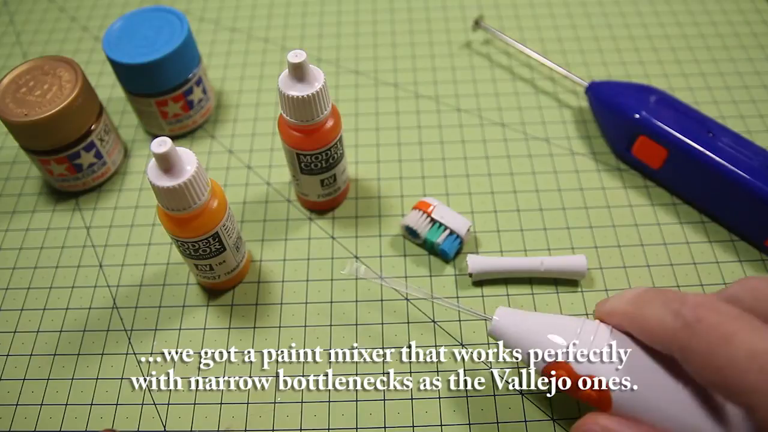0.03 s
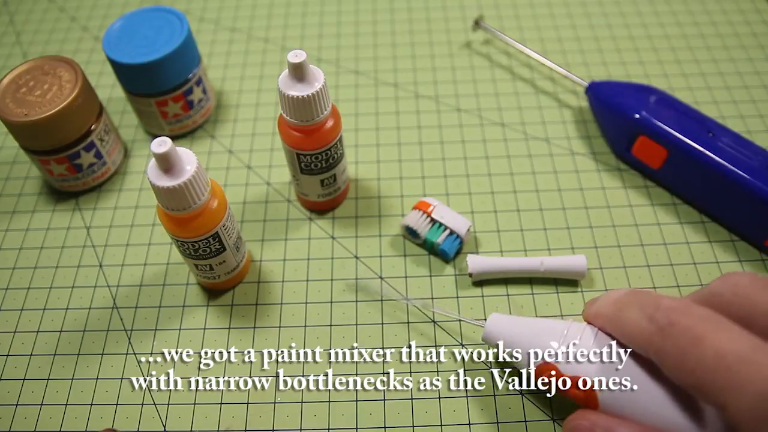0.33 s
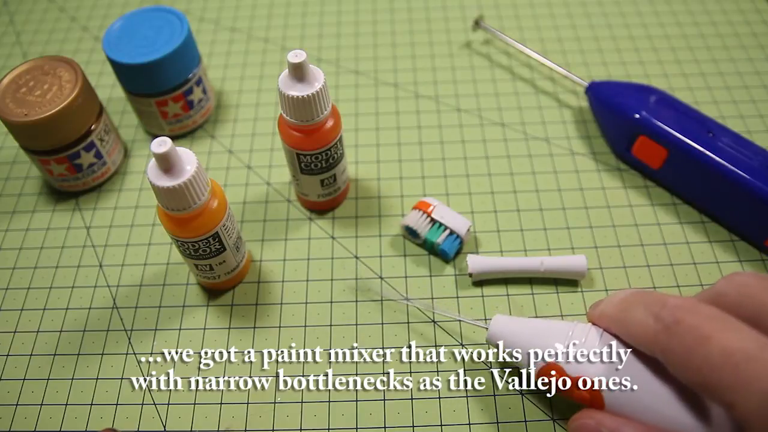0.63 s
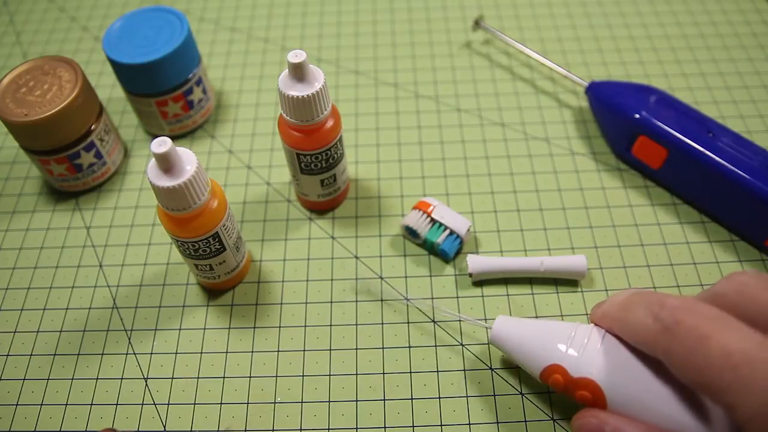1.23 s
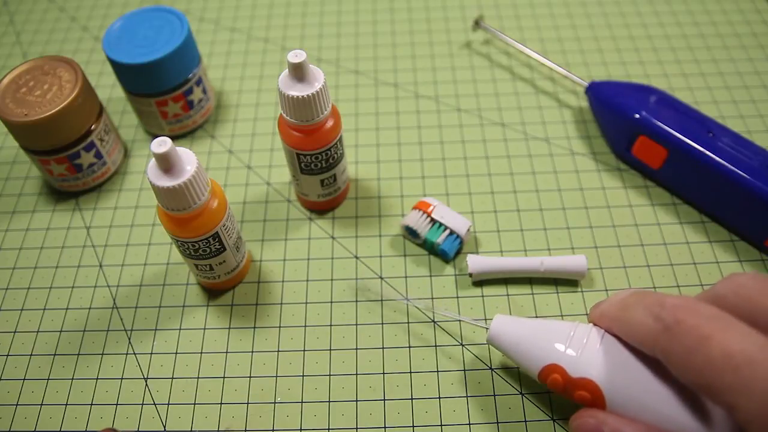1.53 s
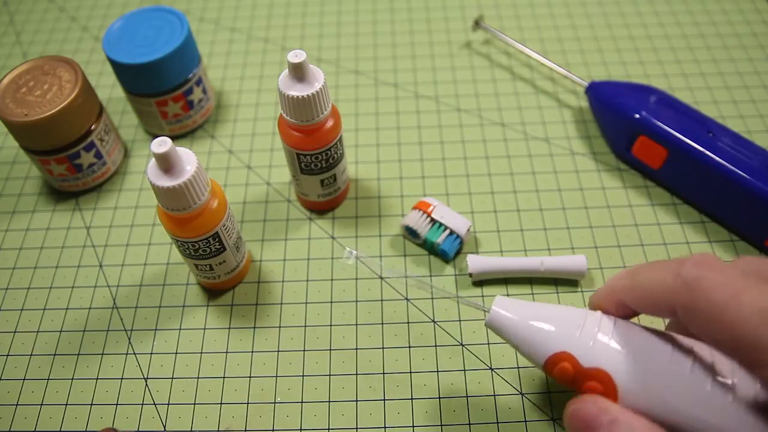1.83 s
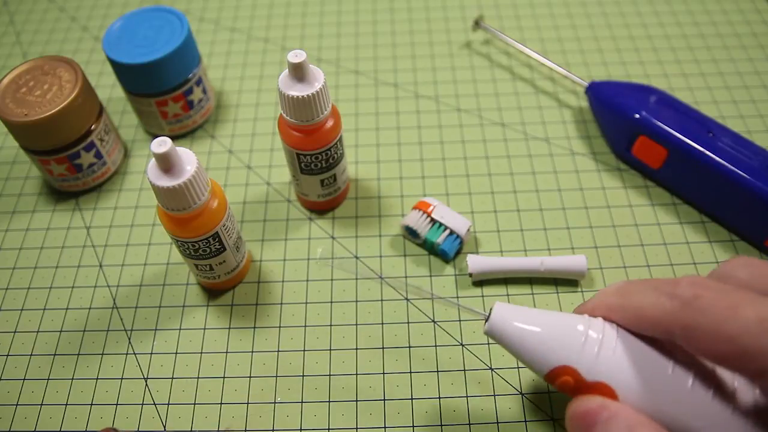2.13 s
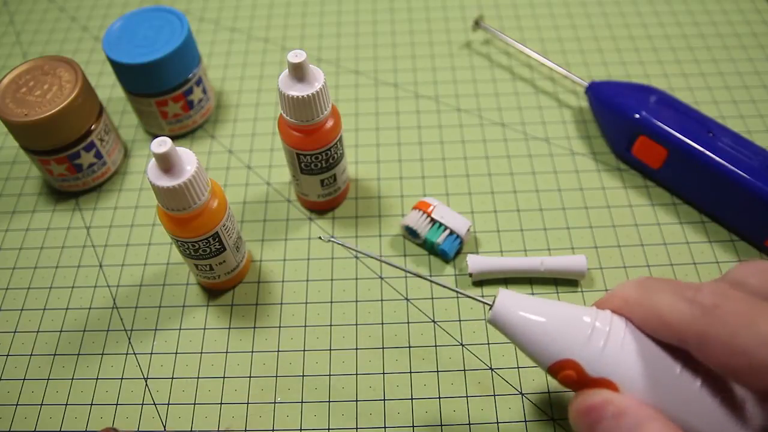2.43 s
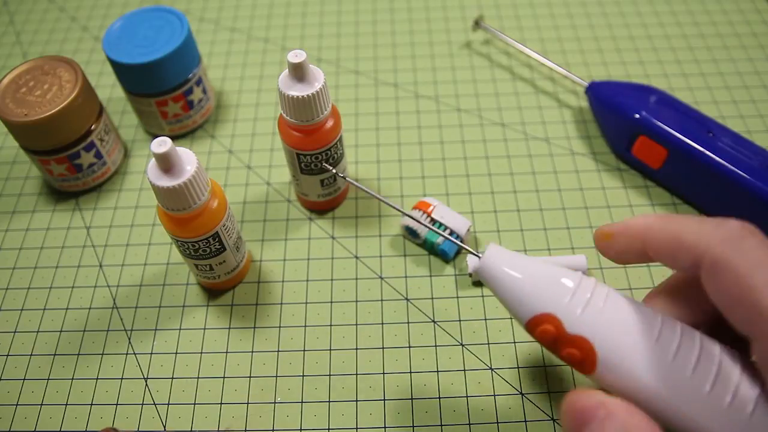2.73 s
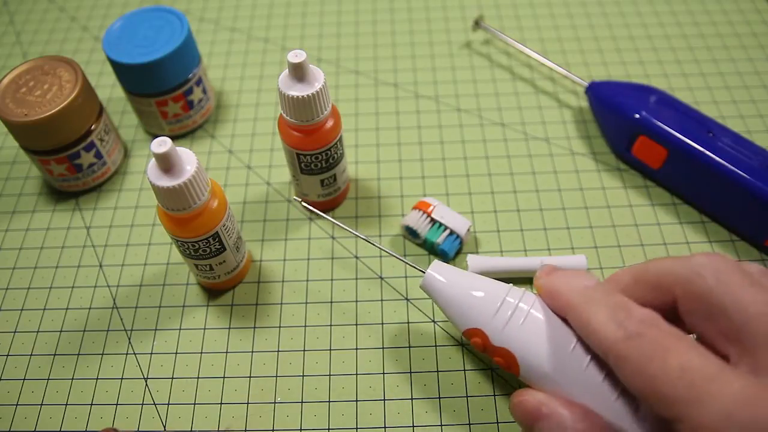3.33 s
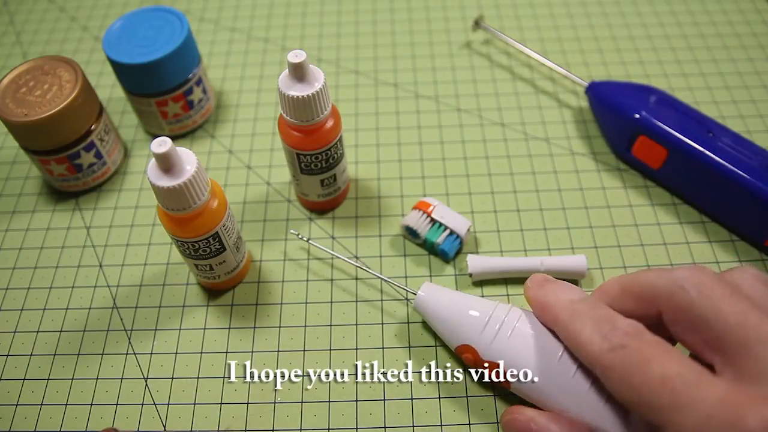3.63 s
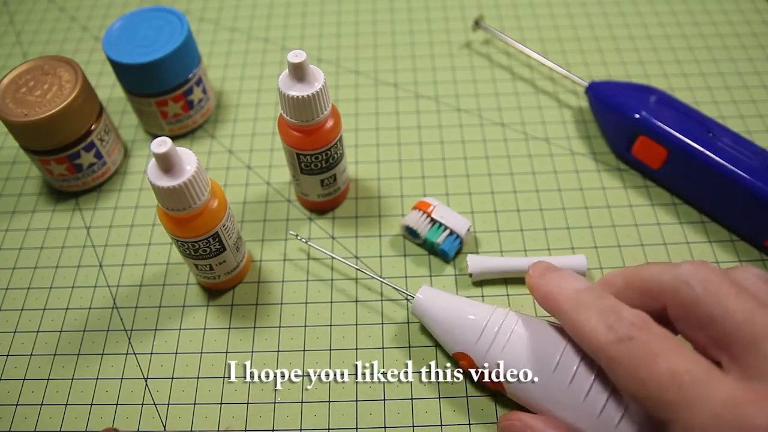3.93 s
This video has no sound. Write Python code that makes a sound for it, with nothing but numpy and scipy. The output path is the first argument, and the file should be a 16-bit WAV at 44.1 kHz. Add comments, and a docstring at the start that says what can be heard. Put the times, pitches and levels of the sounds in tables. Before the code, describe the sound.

A small battery mixer hums with a thin buzz from the start. Between about 0.3 and 1.8 seconds its wire whisk rattles in several short, loud bursts. The motor turns rougher, then stops with a sharp switch click at 2.4 seconds. Fingers tick faintly on the plastic case. At 3.5 seconds the mixer is set down on a table with a thump, followed by a few light ticks.

```python
"""A small battery mixer hums in the hand above a table in a bare little room. From 0.35 s to 1.75 s its wire
whisk whips into bursts of rattling, about one knock per turn, which drag the motor down. At 2.4 s the switch
snaps off and the motor dies away. Fingers then shift on the plastic case, and at 3.5 s the mixer is set down:
the impact excites the modes of the table in a thump, and a few last ticks follow."""
import sys
import numpy as np
from scipy import signal
from scipy.fft import rfft, irfft
from scipy.io import wavfile
from scipy.ndimage import uniform_filter1d

SR = 44100
rng = np.random.default_rng(int(sys.argv[2]) if len(sys.argv) > 2 else 0)


def dump_mix(stems):
    """Bounce the given channels to the path in sys.argv[1] as a 16-bit WAV at rate SR."""
    frames = np.atleast_2d(stems).T  # one column per channel
    limited = np.clip(frames, -1, 1)  # hard clip at full scale
    pcm = np.round(limited * 32767).astype(np.int16)
    wavfile.write(sys.argv[1], SR, pcm)


N = 176400
T = np.arange(N) / SR
OFF_S = 2.4225

# Levels are relative; spectra give level per unit bandwidth.
# bursts of rattling: t/s, length/s, first knock rate/Hz, sag of rate/Hz, first level/dB, last level/dB
RATTLE_BURSTS = [(0.3467, 0.13, 102, 5.5, -1, -1.5), (.4977, 0.12, 102.4, 5.3, 0, -0.5),
                 (0.7086, 0.063, 102.1, 5.8, -2, 0), (0.9192, .082, 101.1, 10, 0.5, -2),
                 (1.2530, 0.11, 101.3, 6.4, -1, 1), (1.4864, 0.072, 100.2, 4.2, -4, -0.5),
                 (1.6177, 0.073, 104.8, 15.45, -1, -4.5), (1.6895, 0.043, 102.3, 6.85, -1.5, -3.5)]
# lone touches of the wire: t/s, level/dB
WIRE_TOUCHES = [(.6996, -10), (1.6086, -12)]
# spectra of a knock in the case and of its thud in the handle: f/Hz, level/dB
KNOCK_SPECTRUM = [(60, 12), (100, -22), (140, -33.5), (200, -28), (300, -29.5), (500, -16), (850, -23),
                  (1350, -4), (1700, -6), (2500, 3), (3200, -5.5), (4200, 2.5), (5000, -7), (7200, -15.5),
                  (8500, -12), (10000, -15.5), (13500, -18.5), (16000, -42)]
THUD_SPECTRUM = [(10, -57.5), (45, -42), (100, -12), (140, -21), (200, -5), (290, -2.5), (480, 5), (680, 4),
                 (850, -1.5), (1300, 10.5), (2500, -31), (16000, -62.5)]
# modes of the case and wire: f/Hz, level/dB, t60/s
CASE_MODES = [(1390, -43, .02), (2525, -52.5, 0.017), (2510, -28, .034), (2840, -45, .04), (3680, -36, .04),
              (3698, -40, .02), (4330, -34, .02), (4940, -38, 0.026), (5760, -38, 0.039),
              (8420, -38.5, .025)]

# rotation rate of the motor: t/s, f/Hz
MOTOR_SPEED = [(0, 99.55), (.33, 99.75), (.37, 97.5), (.53, 100), (.63, 96.3), (.72, 101), (.79, 96),
               (.88, 100), (1.05, 99.6), (1.24, 100), (1.38, 97.3), (1.48, 99), (1.76, 97.3), (1.88, 100.9),
               (1.96, 101.4), (2.04, 97.9), (2.11, 96.8), (2.22, 96.6), (2.32, 94.2), (2.42, 90)]
# levels of the motor's parts: t/s, buzz/dB, strong orders/dB, whine/dB, brush ticks/dB, sizzle/dB
MOTOR_LEVELS = [(0, -46, -41.5, -54.5, -50.5, -74), (.33, -46, -40.5, -56.5, -51, -68),
                (1.15, -46, -49, -66.5, -60.5, -68.5), (1.9, -47, -53, -64, -64, -66.5),
                (2.08, -47, -50.5, -54, -61, -58), (2.22, -44.5, -53, -53, -60.5, -55),
                (2.33, -42.5, -49.5, -43.5, -60, -62.5), (2.42, -47, -49, -56, -62.5, -58)]
# irregularity of the motor: t/s, roughness (0-1)
MOTOR_ROUGHNESS = [(.3, .08), (1.2, .25), (2.2, .2), (2.33, .5), (2.42, .7)]
# strong orders: multiple of the rotation rate; level/dB of each
STRONG_ORDERS = [6, 11, 12, 19, 20, 24, 27, 28, 29, 30, 34, 36, 40, 42, 44]
ORDER_LEVELS = [-17.5, -15, -21.5, -0.5, 1, 2, -1.5, -4.5, 1.5, -3, -1.5, 3.5, -9.5, 3, -14.5]
# spectra of the case's buzz and the brushes' ticks and sizzle: f/Hz, level/dB
BUZZ_SPECTRUM = [(90, -22.5), (800, -17.5), (1300, -7), (2000, -1.5), (2700, -5), (3300, -9.5), (4200, -2),
                 (5200, -13), (7000, -16), (16000, -15)]
BRUSH_SPECTRUM = [(2000, -30), (5500, -11.5), (7200, -14.5), (9000, -6), (10700, 10.5), (13200, -8.5),
                  (15300, 13), (16500, -3)]
SIZZLE_SPECTRUM = [(2000, -13), (6000, -10), (8900, -9.5), (9700, 0), (11200, 1.5), (11900, -12),
                   (13800, -7), (15200, -2), (16500, -1.5)]

# spectra of the switch, heard directly and as radiated into the room: f/Hz, level/dB
SNAP_SPECTRUM = [(40, -21), (1200, -8.5), (2200, -6.5), (3200, -6), (4200, 4.5), (5500, -3), (7000, -6),
                 (8700, 5), (10200, -3.5), (12200, 3), (14500, -1), (16000, -29.5)]
SNAP_ROOM_SPECTRUM = [(100, -32), (2000, -15), (4300, -4), (6500, 2), (8000, -2), (9000, 1.5), (10500, -4),
                      (12500, 0), (16000, -9.5)]
# blows on the table: t/s, blow level/dB, crack level/dB
LANDING_BLOWS = [(3.4648, 2, 7.5), (3.469, -9.5, 0.5)]
# modes of the table top, then its long-ringing low modes: f/Hz, level/dB, t60/s
TABLE_MODES = [(275, -28.5, 0.028), (433, -14, .035), (457, -16, 0.034), (575, -14.5, 0.068),
               (662, -10.5, 0.027), (933, -16.5, 0.026), (1112, -22, .03)]
TABLE_LOW_MODES = [(116, -38, 0.63), (193.5, -38.5, 0.24)]
# spectra of the table's boom and the plastic's crack: f/Hz, level/dB
BOOM_SPECTRUM = [(10, -49.5), (40, -33), (90, -20.5), (145, -30), (200, -5), (300, -15.5), (440, 2.5),
                 (680, -1.5), (800, -2.5), (950, 0.5), (1120, -2.5), (1350, -27.5), (3000, -40.5),
                 (16000, -73)]
CRACK_SPECTRUM = [(100, -4.5), (1300, -0.5), (1900, 7.5), (3000, -0.5), (3800, -6.5), (5000, 0.5),
                  (7500, -11), (11000, -15), (16000, -31.5)]
# ticks of fingers and loose plastic: t/s, level/dB, centre f/Hz, t60/s
HANDLING_TICKS = [(2.2543, -23.5, 3000, 0.011), (2.3915, -11, 2430, 0.0065), (2.551, -15, 2170, 0.021),
                  (2.565, -23, 5040, 0.011), (2.578, -26, 2230, 0.014), (2.745, -28, 9000, 0.078),
                  (2.762, -27.5, 7900, 0.047), (2.9758, -32.5, 3500, 0.025), (3.0978, -26, 2300, 0.036),
                  (3.152, -29.5, 1890, .05), (3.1846, -33, 2000, .02), (3.606, -15.5, 3820, .035),
                  (3.635, -20.5, 8000, 0.056), (3.651, -21, 1700, .03)]

# spectrum of the room's hiss and rumble: f/Hz, level/dB
AMBIENT_SPECTRUM = [(15, -36.5), (25, -27.5), (170, -5.5), (195, -4), (575, -4.5), (754, -3.5), (1190, -7),
                    (2350, -9), (2840, -10.5), (6920, -16), (16000, -27)]
# reverberation time of the room: f/Hz, t60/s
ROOM_DECAY = [(100, 0.81), (500, .5), (1400, 0.53), (4000, 0.36), (9000, 0.41), (16000, 0.26)]


def whisk_knocks(release_s=.032, release_db_per_s=628):
    """Impact train (t/s, level/dB): the rate sags through each burst, then the level decays."""
    knocks = list(WIRE_TOUCHES)
    for start, length, first_hz, sag_hz, first_db, last_db in RATTLE_BURSTS:
        t = 0
        while t < length + release_s:
            progress = min(t / length, 1)
            db = first_db + (last_db - first_db) * progress
            knocks.append((start + t, db - release_db_per_s * max(t - length, 0)))
            t += 1 / (first_hz - sag_hz * progress ** 2)
    return knocks


def whisk_rattle(chatter_s=0.004, push=0.44, jitter_s=.0001, spread_db=.6, size=900):
    """Impact excitation: each knock thuds through the handle, and its chatter rings the case."""
    drives, pushes = np.zeros((len(RATTLE_BURSTS), N)), np.zeros(N)
    middles = np.array([start + length / 2 for start, length, *_ in RATTLE_BURSTS])
    draws = rng.standard_normal((160, size + 2))
    for (s, db), (late, loud, *grain) in zip(whisk_knocks(), draws):
        chatter = highpass(grain * np.exp(-T[:size] / chatter_s), hz=900)
        contact = amp(-3) * unit_energy(chatter)
        contact[0] += push
        at, strength = s + jitter_s * late, amp(db + spread_db * loud)
        add(drives[np.argmin(abs(middles - s))], at, strength * contact)
        add(pushes, at, np.array([strength]))
    # each burst rings the case a little differently
    ringing = sum(through(drive, dense_modes(t60=0.01)) for drive in drives)
    case = through(ringing, colour(KNOCK_SPECTRUM)) + through(pushes, ring(CASE_MODES))
    thud = through(through(pushes, colour(THUD_SPECTRUM)), dense_modes(t60=.04))
    hum = through(pushes, ring([(198, -50, 0.23)]))
    sound = reverberate(amp(11) * case + amp(-9) * thud, wet_db=-13) + hum
    return highpass(sound, hz=92, order=4)


def turn_pulses(turns):
    """Band-limited sampling: one windowed sinc impulse at each completed turn."""
    pulses, near = np.zeros(N + 16), np.arange(-8, 9)
    for at in np.interp(np.arange(1, int(turns[-1])), turns, np.arange(N)):
        pulses[int(at) + near] += np.sinc(near - at % 1) * np.hanning(len(near))
    return pulses[:N]


def motor(flutter=.0003, spark_turns=.35, whine_order=15, coast_s=0.016):
    """Periodic forcing: each turn shakes the case and sparks the brushes, giving harmonics of the rate."""
    hz = np.interp(T, *np.transpose(MOTOR_SPEED)) * (1 + flutter * wander(size=900))
    turns = np.cumsum(hz) / SR
    times, *levels = np.transpose(MOTOR_LEVELS)
    buzz, strong, whine, brush, sizzle = (amp(np.interp(T, times, level)) for level in levels)
    rough = np.interp(T, *np.transpose(MOTOR_ROUGHNESS))
    pulses = turn_pulses(turns)
    puffs = unit_rms(np.exp(-(turns % 1) / spark_turns) * rng.standard_normal(N))
    periodic = unit_rms(through(pulses, dense_modes(t60=0.1)))
    shake = np.sqrt(1 - rough ** 2) * periodic + rough * rng.standard_normal(N)
    sparks = unit_rms(through(pulses, dense_modes(t60=0.05))) + 2 * rough * puffs
    orders = sum(amp(db) * np.sin(2 * np.pi * (k * turns + rng.random()))
                 for k, db in zip(STRONG_ORDERS, ORDER_LEVELS))
    waver = 1 + rough * wander(size=400)
    sound = buzz * through(shake, colour(BUZZ_SPECTRUM))
    sound += brush * through(sparks, colour(BRUSH_SPECTRUM))
    sound += sizzle * through(sparks, colour(SIZZLE_SPECTRUM))
    sound += strong * unit_rms(orders)
    sound += whine * waver * unit_rms(np.sin(2 * np.pi * whine_order * turns))
    sound *= np.exp(-np.maximum(T - OFF_S, 0) / coast_s)
    return reverberate(sound, wet_db=-12)


def set_down():
    """Modal response to impact: the case lands on edge, then flat; plastic cracks and the table booms."""
    blows, crack = np.zeros(N), np.zeros(N)
    for s, db, crack_db in LANDING_BLOWS:
        add(blows, s, amp([db]))
        add(crack, s, amp(crack_db) * dense_modes(t60=0.02))
    top = highpass(through(blows, ring(TABLE_MODES)), hz=230)
    top += amp(13) * through(blows, colour(BOOM_SPECTRUM))
    boom = reverberate(top, wet_db=-12, onset_s=0.0078)
    add(boom, LANDING_BLOWS[0][0], ring(TABLE_LOW_MODES))
    return boom + reverberate(through(crack, colour(CRACK_SPECTRUM)), wet_db=-15)


def switch_snap():
    """Transient excitation: the slide switch snaps, the shell rings in the treble, the room answers."""
    snap, radiated = np.zeros(N), np.zeros(N)
    add(snap, OFF_S, amp(15) * dense_modes(t60=0.00366))
    add(snap, OFF_S, amp(7) * highpass(dense_modes(t60=.05), hz=2500))
    add(radiated, OFF_S, colour(SNAP_ROOM_SPECTRUM))
    tail = reverberate(radiated, wet_db=1) - radiated
    return through(snap, colour(SNAP_SPECTRUM)) + tail


def handling_ticks():
    """Damped resonance: fingers and loose parts tap the plastic, each exciting one broad band."""
    ticks = np.zeros(N)
    for s, db, hz, t60 in HANDLING_TICKS:
        band = [(hz / 3, -22), (hz / 1.3, -3), (hz, 0), (hz * 2, -15), (hz * 6, -28)]
        add(ticks, s, amp(db) * through(dense_modes(t60), colour(band)))
    return reverberate(ticks, wet_db=-7)


def ambient_noise(rms_db=-58.5):
    """Stationary noise: the faint hiss and rumble of the room."""
    return amp(rms_db) * unit_rms(through(rng.standard_normal(N), colour(AMBIENT_SPECTRUM)))


def reverberate(x, wet_db, onset_s=0.0023):
    """Diffuse field: adds a noise tail in which each band has its own reverberation time."""
    hz, t, bands = signal.stft(rng.standard_normal(SR), SR, nperseg=256)
    decay = amp(-60 * t / at_frequency(ROOM_DECAY, hz)[:, None])
    tail = signal.istft(bands * decay, SR, nperseg=256)[1][:SR]
    build_up = np.minimum(T[:SR] / onset_s, 1) ** 2
    return x + amp(wet_db) * through(x, unit_energy(tail * build_up))


def ring(modes, size=22050):
    """Free vibration: a sum of exponentially damped sines."""
    t = T[:size]
    return sum(amp(db - 60 * t / t60) * np.sin(2 * np.pi * hz * t) for hz, db, t60 in modes)


def dense_modes(t60, size=4096, passes=4):
    """High modal overlap: decaying noise, whitened to a nearly flat spectrum."""
    fade = amp(-60 * T[:size] / t60)
    x = rng.standard_normal(size) * fade
    for _ in range(passes):
        spectrum = rfft(x)
        x = irfft(spectrum / (abs(spectrum) + 1e-9)) * fade ** (1 / passes)
    return unit_energy(x)


def colour(spectrum, size=4096):
    """Minimum phase: the causal impulse response of a spectrum, with unit energy."""
    hz = abs(np.fft.fftfreq(size, 1 / SR))
    log_gain = np.log(amp(at_frequency(spectrum, hz)))
    transfer = np.exp(np.conj(signal.hilbert(log_gain)))
    return unit_energy(np.fft.ifft(transfer).real[:size // 2])


def wander(size):
    """Slow fluctuation: a moving average of noise, with unit rms."""
    return unit_rms(uniform_filter1d(rng.standard_normal(N), size=size))


def highpass(x, hz, order=2):
    """Maximally flat high-pass filtering."""
    return signal.sosfilt(signal.butter(order, hz, "high", fs=SR, output="sos"), x)


def through(x, response):
    """Convolution, cut to the input's length."""
    return signal.fftconvolve(x, response)[:len(x)]


def add(mix, s, sound):
    """Superposition of a sound starting at s seconds."""
    part = mix[max(round(s * SR), 0):][:len(sound)]
    part += sound[:len(part)]


def at_frequency(points, hz):
    """Interpolation on a log-frequency axis."""
    f, value = np.transpose(points)
    return np.interp(np.log(hz + 1), np.log(f + 1), value)


def amp(db):
    """Amplitude ratio of a level in decibels."""
    return 10 ** (np.asarray(db) / 20)


def unit_rms(x):
    """Normalisation to unit power."""
    return x / np.sqrt(np.mean(x ** 2) + 1e-20)


def unit_energy(x):
    """Normalisation to unit energy."""
    return x / (np.linalg.norm(x) + 1e-12)


def scene():
    """Superposition of the mixer's sounds and the room's noise in one channel."""
    ambient = ambient_noise()
    return (motor() + whisk_rattle() + switch_snap() + set_down() + handling_ticks() + ambient)[None]


def record(dry, cutoff_hz=15750):
    """Saturation and band limiting: the loudest peaks clip, then pass a low-pass filter."""
    lowpass = signal.firwin(511, cutoff_hz, window=("kaiser", 8), fs=SR)
    return signal.oaconvolve(np.clip(dry, -1, 1), lowpass[None], "same")


dry = scene()
out = record(dry)
dump_mix(out)
```